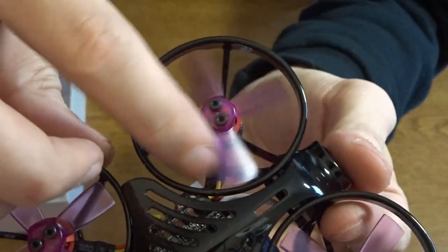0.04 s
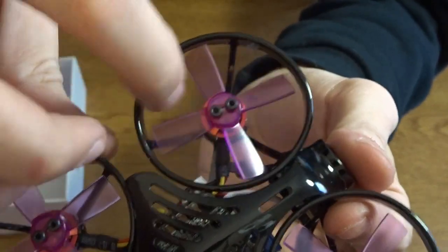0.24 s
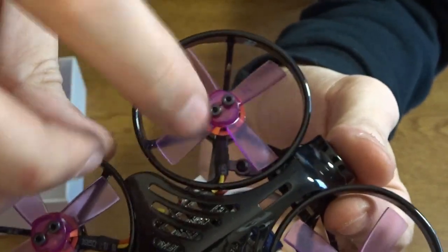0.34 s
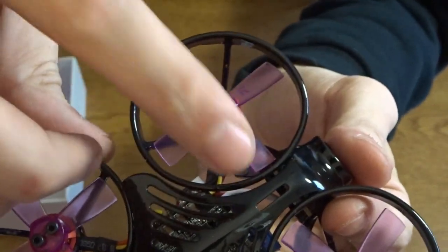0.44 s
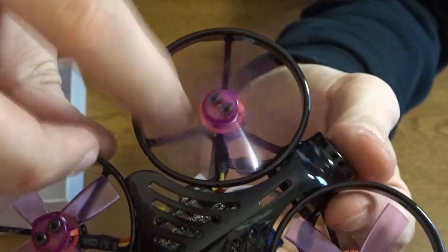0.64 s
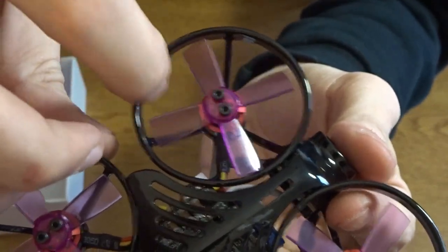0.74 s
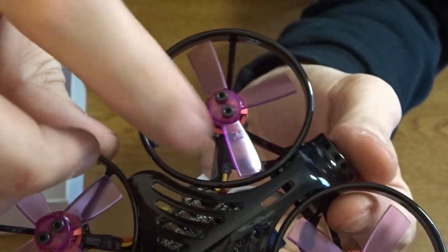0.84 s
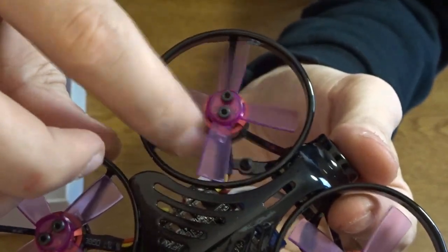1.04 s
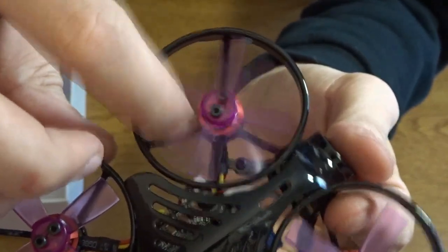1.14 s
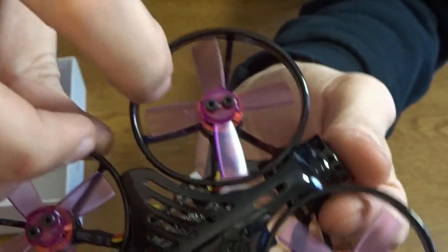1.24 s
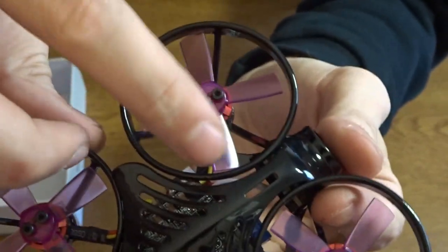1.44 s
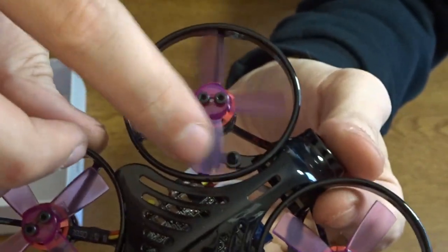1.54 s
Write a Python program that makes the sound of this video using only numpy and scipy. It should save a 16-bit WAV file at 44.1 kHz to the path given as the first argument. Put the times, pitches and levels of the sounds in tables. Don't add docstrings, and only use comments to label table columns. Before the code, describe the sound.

A small plastic propeller is flicked by a finger, close to the microphone. Faint rubs come first, then nail taps at about 0.12, 0.63 and 1.08 seconds, each followed by brittle, bright clustered clicks at 0.21, 0.68 and 1.19 with a short low springy twang. A weak lone tick falls at 0.32. A quiet, wavering fan hum and slight hiss continue in a small room.

```python
import sys
import numpy as np
from scipy import signal
from scipy.fft import rfft, irfft
from scipy.io import wavfile
from scipy.ndimage import uniform_filter1d

SR = 44100
rng = np.random.default_rng(int(sys.argv[2]) if len(sys.argv) > 2 else 0)


def amplitude_ratio(level_db):
    exponent = np.asarray(level_db, float) / 20
    return 10 ** exponent


def to_wav(s):
    ch = np.atleast_2d(s).T
    pcm = np.round(np.clip(ch, -1, 1) * 32767)
    wavfile.write(sys.argv[1], SR, pcm.astype(np.int16))


N = 70560

# (frequency [Hz], level [dB], T60 [s])
HUB_MODES = [(4335, 0, .046), (4222, -12, .035), (4616, -10, .035), (4490, -15, .045), (4655, -13, .035),
             (4800, -17, .012)]
# (frequency [Hz], level [dB], T60 [s])
TIP_MODES = [(11610, 3.5, 0.0097), (11600, -4, 0.011), (12160, 3, 0.0065), (13440, -17, .006),
             (8600, -26, 0.012), (14700, -25, 0.0054)]


def level(x, db):
    return x * amplitude_ratio(db) / np.sqrt(np.mean(x ** 2))


def curve(table):
    hz, db = np.array(table, float).T
    bins_hz = np.arange(N // 2 + 1) * SR / N
    return np.interp(np.log(bins_hz + 1), np.log(hz), db)


def noise(table, db):
    below = (table[0][0] * 0.9, -80)
    above = (table[-1][0] * 1.1, -80)
    colour = amplitude_ratio(curve([below] + list(table) + [above]))
    return level(irfft(rfft(rng.standard_normal(N)) * colour, N), db)


def walk(rate_hz):
    hold = int(SR / rate_hz)
    steps = np.repeat(rng.standard_normal(N // hold + 1), hold)
    return 1.3 * uniform_filter1d(uniform_filter1d(steps, hold), hold)[:N]


def motor_whine():
    # (frequency [Hz], width [Hz], level [dB])
    lines = [(388.3, 8, -70.5), (351.7, 8.8, -70), (447, 17, -75), (559, 40, -66), (613.6, 36, -72)]
    hz = np.arange(N // 2 + 1) * SR / N
    out = np.zeros(N)
    for line_hz, width_hz, db in lines:
        resonance = 1 / (1 + (2 * (hz - line_hz) / width_hz) ** 2)
        out += level(irfft(rfft(rng.standard_normal(N)) * resonance, N), db)
    return out


def fan():
    # (frequency [Hz], density [dB per Hz])
    air_mid = [(400, -26), (470, -10), (600, -3.5), (800, 0.5), (1050, -11), (1350, -2.5), (1650, -4.5),
               (2600, -30.5)]
    # (frequency [Hz], density [dB per Hz])
    air_side = [(150, -33), (400, -16.5), (800, 2), (1150, -12.5), (1600, -0.5), (2600, -18), (4000, -23.5),
                (8000, -30)]
    # (frequency [Hz], level [dB])
    left_excess = [(100, 0), (300, -3), (700, -0.5), (1300, -3), (2500, 1), (8000, -0.5)]
    # (frequency [Hz], density [dB per Hz])
    rumble = [(20, -46), (70, -41), (120, -28), (200, -23.5), (280, -16), (340, -13), (440, -13.5)]
    # (frequency [Hz], density [dB per Hz])
    hiss = [(1180, -45), (2000, -1), (2850, -8.5), (5240, -8.5), (15200, -13.5), (16100, -21), (16500, -26)]
    air_db, rumble_db, hiss_db = -57.5, -71.5, -66

    motor_hz = 391.6 + 1.88 * walk(7.92)
    motor = amplitude_ratio(1.15 * walk(11.75)) * np.sin(2 * np.pi * np.cumsum(motor_hz) / SR)
    mid = amplitude_ratio(1.03 * walk(7.05)) * noise(air_mid, air_db)
    mid = mid + motor_whine() + level(motor, -64.5)
    mid = mid + noise(rumble, rumble_db) + noise(hiss, hiss_db)

    side = amplitude_ratio(0.58 * walk(11)) * noise(air_side, air_db)
    side = side + amplitude_ratio(-7) * motor_whine()
    side = side + noise(rumble, rumble_db - 8.5) + noise(hiss, hiss_db - 14)

    lean_db = curve(left_excess) / 2
    stereo = np.array([mid + side, mid - side])
    return irfft(rfft(stereo) * amplitude_ratio(np.array([lean_db, -lean_db])), N)


def room(x):
    room_db, t60_s, treble_t60_s, width = -17.5, 0.28, 0.24, 0.24
    t = np.arange(SR // 2) / SR
    low_band = signal.butter(2, [1500, 9000], "band", fs=SR, output="sos")
    high_band = signal.butter(2, 9000, "high", fs=SR, output="sos")
    tails = []
    for _ in range(2):
        low = signal.sosfilt(low_band, rng.standard_normal(len(t))) * 1000 ** (-t / t60_s)
        high = signal.sosfilt(high_band, rng.standard_normal(len(t))) * 1000 ** (-t / treble_t60_s)
        response = (low + 0.74 * high) * (1 - np.exp(-t / 0.001))
        tails.append(signal.fftconvolve(x, response * amplitude_ratio(room_db - 25))[:N])
    return tails[0] + width * tails[1] * np.array([[1], [-1]])


def add(track, s, sound):
    i = int(s * SR)
    track[i:i + len(sound)] += sound[:N - i]


def ring(modes, scatter_db=2.5, push_s=0.0001):
    t = np.arange(SR // 2) / SR
    out = np.zeros(len(t))
    for hz, db, t60_s in modes:
        blow_db = db + scatter_db * rng.standard_normal()
        pitch_hz = hz * (1 + 0.001 * rng.standard_normal())
        out += amplitude_ratio(blow_db) * np.sin(2 * np.pi * pitch_hz * t) * 1000 ** (-t / t60_s)
    return out * (1 - np.exp(-t / push_s))


def crack(bright_db=0):
    # (frequency [Hz], width [Hz], level [dB])
    resonances = [(4290, 360, 2.5), (6100, 1900, 1), (8020, 1700, -0.5), (9600, 2500, -2.5),
                  (11770, 1370, 1), (14000, 2200, -2.5)]
    t = np.arange(SR // 20) / SR
    burst = (0.2 * rng.standard_normal(len(t)) + 3 * (t == 0)) * np.exp(-t / 0.00046)
    snap = np.zeros(len(t))
    for k, (hz, width_hz, db) in enumerate(resonances):
        gain = amplitude_ratio(db + bright_db * (hz > 10000))
        sign = (-1) ** k
        snap += sign * gain * signal.lfilter(*signal.iirpeak(hz, hz / width_hz, SR), burst)
    return signal.sosfilt(signal.butter(3, 3850, "high", fs=SR, output="sos"), snap)


def landings():
    # (time [s], level [dB], brightness [dB])
    nail_hits = [
        (0.1214, -33.5, 5),
        (.6300, -34, 3),
        (1.0762, -30, 9),
    ]
    # (frequency [Hz], level [dB], T60 [s])
    knock_modes = [(1840, -13, 0.027), (3560, -12, 0.02), (3540, -17.5, 0.024), (3585, -27.5, 0.15),
                   (4540, -9.5, 0.013), (6230, -4.5, 0.0048)]
    # (frequency [Hz], level [dB], T60 [s])
    ping_modes = [(12070, 9.5, 0.0047), (12460, 10, 0.004), (9600, -14, 0.015), (14100, -17, 0.0055)]
    out = np.zeros((2, N))
    for s, db, bright_db in nail_hits:
        add(out[0], s, amplitude_ratio(db - 6) * crack())
        ping = amplitude_ratio(bright_db - 4) * ring(ping_modes, push_s=0.00047)
        add(out[1], s, amplitude_ratio(db) * (ring(knock_modes) + ping))
    return out


def brushes():
    # (start [s], length [s], level [dB])
    rubs = [
        (0.026, 0.014, -68.5),
        (0.082, 0.015, -76),
        (0.997, 0.057, -71),
    ]
    out = np.zeros(N)
    for s, length_s, db in rubs:
        n = int(length_s * SR)
        force = rng.standard_normal(n) * signal.windows.tukey(n, 0.3)
        response = (ring(HUB_MODES) + 1.4 * ring(TIP_MODES))[:SR // 20]
        add(out, s, level(signal.fftconvolve(force, response), db))
    return out


def rim():
    # (time [s], level [dB])
    touches = [
        (.0273, -65),
        (0.2275, -51),
        (0.3332, -56),
        (0.7013, -35),
        (1.206, -45),
    ]
    # (frequency [Hz], level [dB], T60 [s])
    rim_modes = [(11790, 0, .04), (11670, -4, .03)]
    out = np.zeros(N)
    for s, db in touches:
        add(out, s, amplitude_ratio(db) * ring(rim_modes))
    return out


def flicks():
    # (time [s], note [dB], note T60 [s], thump [dB], frame knock [dB])
    releases = [
        (.2126, -27, 0.27, -67, -34.5),
        (.6778, -28.5, 0.27, -80, -35.5),
        (1.1872, -29, 0.34, -69, -40),
    ]
    # (frequency [Hz], level [dB], T60 [s])
    frame_modes = [(3640, 2.5, 0.018), (5800, 5, 0.017), (6370, 3.5, 0.02), (7570, -1, 0.018),
                   (5280, 5, 0.0055), (8170, -8, 0.022), (1905, -7.5, 0.022), (2593, -8, 0.023),
                   (1205, -14.5, 0.033)]
    bend_hz, thump_hz, thump_t60_s, knock_lag_s = 760, 95, 0.07, 0.001004
    out = np.zeros((2, N))
    for s, note_db, t60_s, thump_db, knock_db in releases:
        note = ring([(bend_hz, note_db, t60_s)], scatter_db=1, push_s=0.0022)
        thump = ring([(thump_hz, thump_db, thump_t60_s)], scatter_db=0, push_s=0.004)
        add(out[0], s, note + thump)
        add(out[1], s + knock_lag_s, amplitude_ratio(knock_db) * ring(frame_modes))
    return out


def ticks():
    # (time [s], crack [dB], crack brightness [dB], hub ring [dB], tip ring [dB])
    contacts = [(0.2125, -15, -13, -31, -23.5), (.2135, -14.5, 6.5, -30.5, -32), (.2163, -27, -9, -46, -36),
                (.2269, -13, 0.5, -30.5, -29), (.3225, -31.5, 0.5, -39.5, -58), (.6776, -40, 4, -22.5, -52),
                (.6789, -13.5, 3.5, -42, -34), (0.7021, -15, -17, -26.5, -32), (1.1874, -21.5, 3, -64, -25),
                (1.1884, -16.5, -1, -48, -47), (1.1907, -24, -2, -29, -48)]
    out = np.zeros((2, N))
    for s, crack_db, bright_db, hub_db, tip_db in contacts:
        add(out[0], s, amplitude_ratio(crack_db) * crack(bright_db))
        add(out[1], s, amplitude_ratio(hub_db) * ring(HUB_MODES, scatter_db=4, push_s=0.00032))
        add(out[1], s, amplitude_ratio(tip_db) * ring(TIP_MODES, push_s=0.00033))
    return out


def scene():
    echo_s, echo_db, left_db = 0.0064, -19, 0.57
    snap, rings = ticks() + landings()
    note, knock = flicks()
    rings = rings + brushes() + rim() + knock
    echo = amplitude_ratio(echo_db) * np.roll(snap + rings, int(echo_s * SR))
    near = (snap + rings + note + echo) * amplitude_ratio(np.array([[left_db], [-left_db]]))
    return near + room(amplitude_ratio(4.5) * snap + 0.75 * rings) + fan()


def band_limit(x):
    return signal.sosfilt(signal.butter(12, 16820, fs=SR, output="sos"), x)


def record(dry):
    low_pass = signal.ellip(6, 0.3, 45, 15750, fs=SR, output="sos")
    return band_limit(signal.sosfilt(low_pass, dry))


dry = scene()
out = record(dry)
to_wav(out)
```